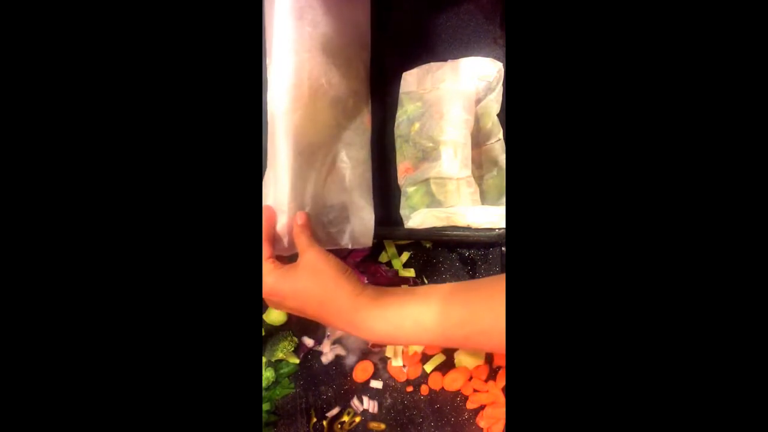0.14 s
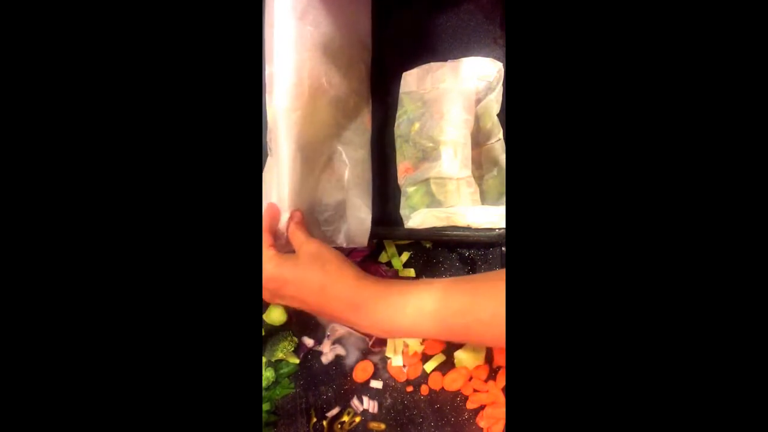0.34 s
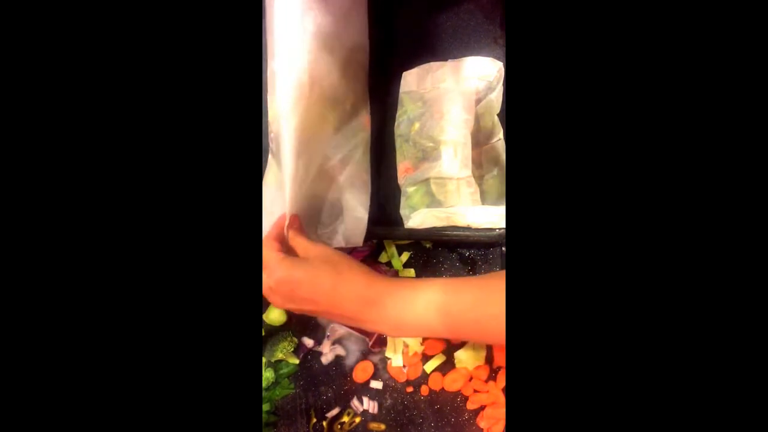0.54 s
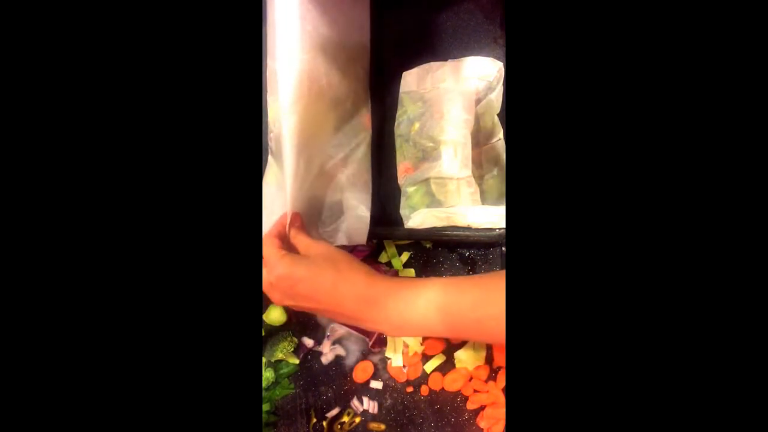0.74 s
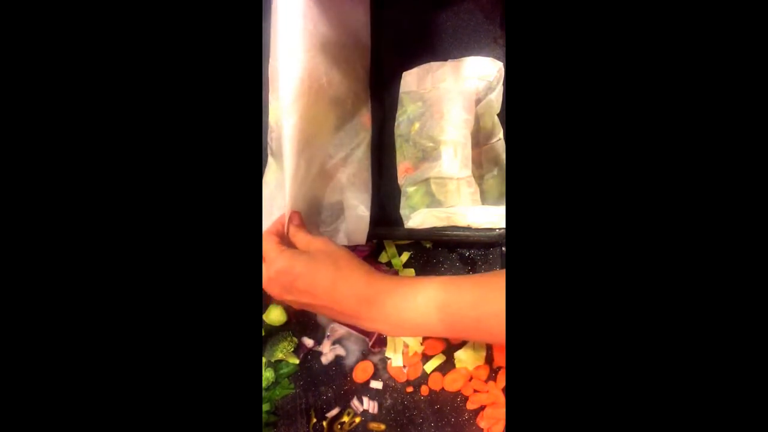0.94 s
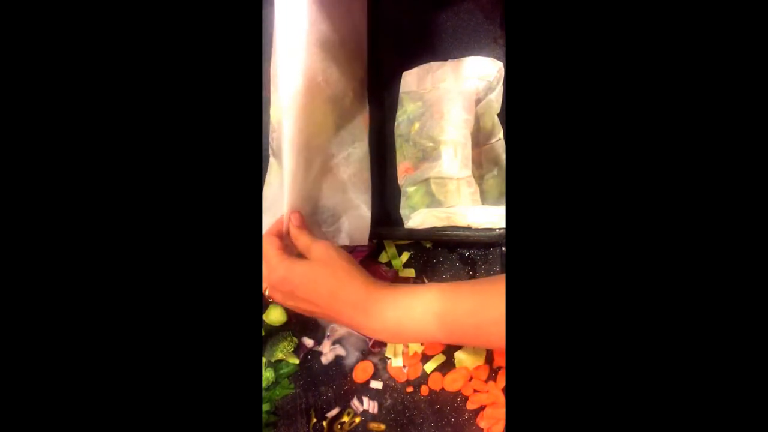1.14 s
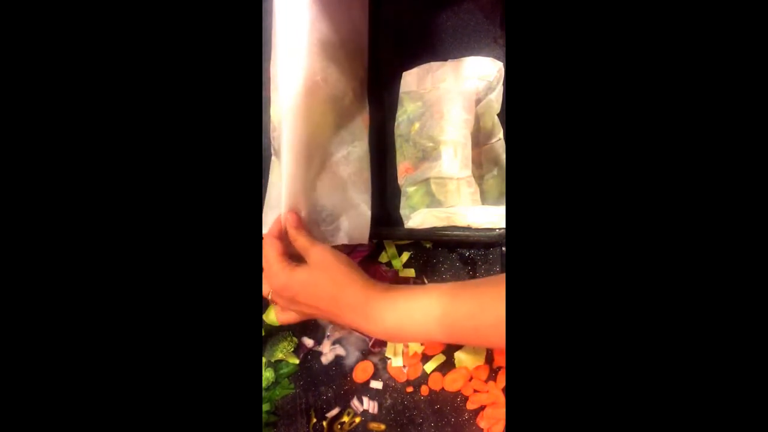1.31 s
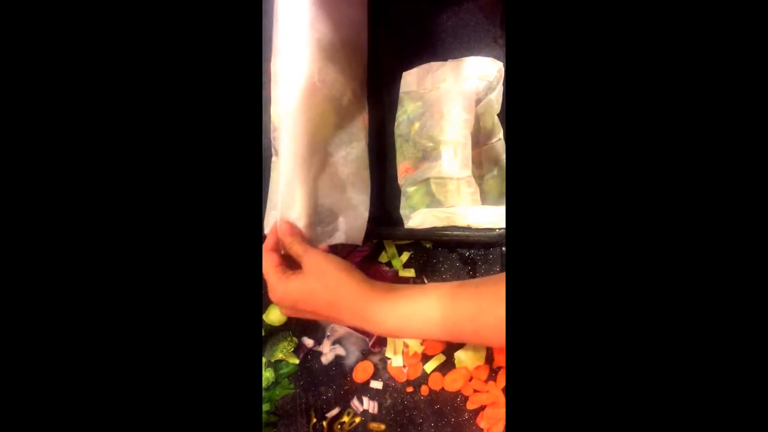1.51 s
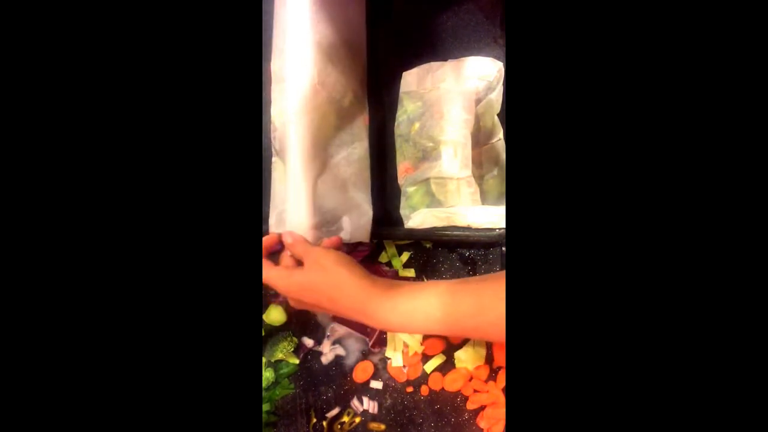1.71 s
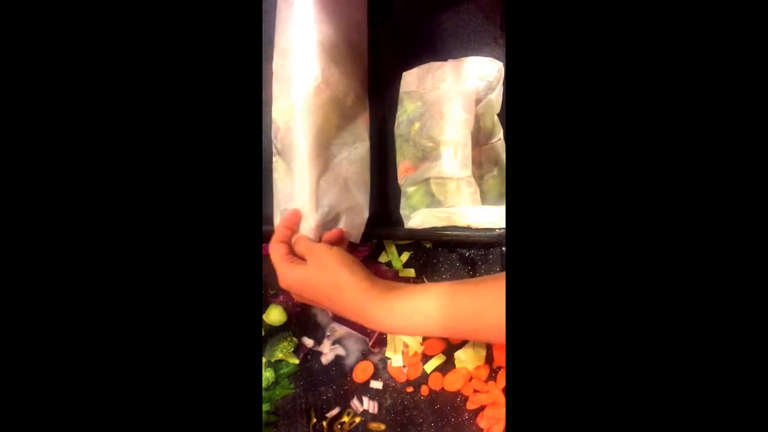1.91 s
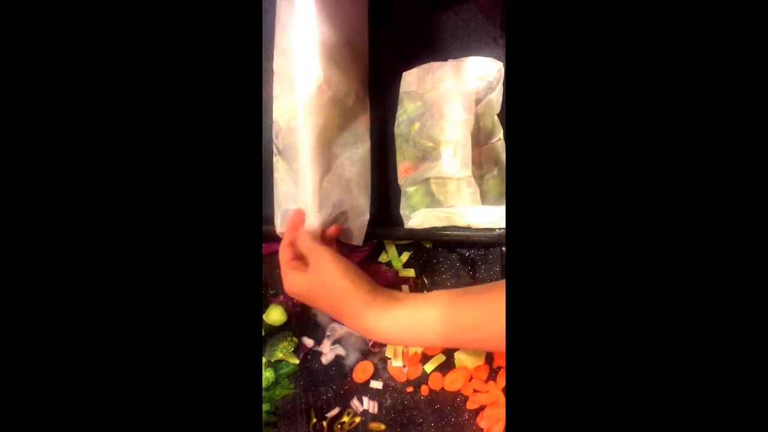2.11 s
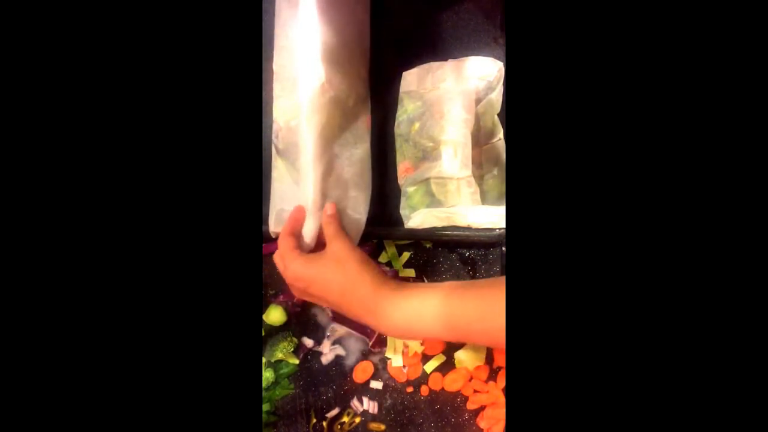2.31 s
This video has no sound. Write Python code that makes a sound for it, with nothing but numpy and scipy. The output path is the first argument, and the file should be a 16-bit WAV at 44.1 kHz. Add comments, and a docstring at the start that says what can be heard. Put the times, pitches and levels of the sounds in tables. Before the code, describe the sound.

Parchment paper crinkles and crackles in short bursts as fingers pinch and fold a packet

```python
"""Short runs of tiny, bright clicks crackle over a papery rustle, close to the microphone, with a faint mains hum.
A hand folds and pinches the edge of a parchment paper packet in a kitchen: creases buckle in runs of clicks,
each ringing a stiff facet of the sheet. Denser, clumped clicks make the rustle; swells of filtered clicks make
the flexing panels and the packet's soft bumps. A decaying noise tail gives the room; sines and noise lie under it."""
import sys
import numpy as np
from scipy import signal
from scipy.fft import rfft, irfft
from scipy.io import wavfile
from scipy.ndimage import uniform_filter1d

SR = 44100
rng = np.random.default_rng(int(sys.argv[2]) if len(sys.argv) > 2 else 0)


def store_wav(level_fs):
    """Save 16-bit WAV to argv[1]."""
    pcm = np.round(np.clip(np.atleast_2d(level_fs), -1, 1) * 32767)
    wavfile.write(sys.argv[1], SR, pcm.T.astype(np.int16))


N = 103635  # length in samples

# Mains hum. Each row: pitch in Hz, level in dB.
HUM_TONES = [(59.3, -53.5), (119.6, -54.5)]
# Colour of the still kitchen air. Each row: frequency in Hz, relative spectrum level in dB.
AIR_COLOUR = [(20, -10), (55, -2), (150, -1), (250, -11.5), (15000, -37)]
# The hand nudges the packet against the pan. Each row: start in seconds, level in dB.
PACKET_BUMPS = [(0.675, -45), (1.825, -55)]
# A broad panel of the sheet pops over. Each row: start in seconds, centre pitch in Hz, level in dB.
PANEL_FLEXES = [(0.216, 771, -38.5), (0.621, 1020, -28), (1.655, 838.1, -35), (1.709, 2651, -47),
                (1.745, 2412, -34), (1.877, 2581, -34.5), (1.96, 2314, -33.5), (2.246, 903.2, -37.5)]
# Bass, middle and treble ranges of the sheet. Each row: lower edge in Hz, upper edge in Hz.
SHEET_BANDS = [(450, 1620.2), (1600, 5606.7), (5500, 13307)]
# Colour of the paper's facets. Each row: frequency in Hz, relative level in dB.
PAPER_COLOUR = [(300, -15), (750, -5), (1100, 2.5), (1800, -7), (2550, 4), (4900, -1.5), (8500, 2.5),
                (10300, -5.5), (15000, 3.5)]
# Rustle as the fingers work the sheet. Each row: time in seconds, then bass, middle and treble levels in dB.
RUSTLE_LEVELS = [(0, -48.5, -39.5, -47.5), (0.09, -58, -58, -58.5), (0.134, -44.5, -45, -54.5),
                 (0.16, -53.5, -59, -63), (0.216, -45, -43, -50.5), (0.285, -60.5, -56, -62),
                 (0.355, -48, -44.5, -52), (0.41, -50, -44.5, -45.5), (0.5, -52.5, -47, -49),
                 (0.588, -46, -40, -46.5), (0.603, -35.5, -29, -21.5), (0.635, -40.5, -31, -29.5),
                 (0.68, -42.5, -32.5, -32.5), (0.75, -60, -57.5, -61), (0.855, -54, -50.5, -55.5),
                 (0.879, -50.5, -38, -37), (0.898, -44, -36.5, -39.5), (0.925, -60.5, -58, -71),
                 (1.035, -60, -50, -55.5), (1.07, -43.5, -39.5, -39), (1.129, -51, -40.5, -46),
                 (1.206, -41, -41.5, -44.5), (1.245, -54.5, -46, -48.5), (1.34, -58.5, -45.5, -47.5),
                 (1.455, -45.5, -41, -39.5), (1.52, -53, -41.5, -42.5), (1.55, -54.5, -54.5, -58.5),
                 (1.585, -45.5, -40, -43.5), (1.665, -44, -38, -39), (1.8, -48.5, -48, -49.5),
                 (1.881, -44.5, -35.5, -39.5), (1.895, -58, -56.5, -59), (1.97, -42.5, -37, -42),
                 (2.02, -49, -45.5, -45.5), (2.06, -40, -35.5, -37.5), (2.09, -53, -46.5, -44),
                 (2.18, -52, -46, -44), (2.281, -46, -46.5, -48), (2.31, -53, -52.5, -55.5)]
# Buckling creases. Each row: start in seconds, length in seconds, then bass, middle and treble levels in dB.
CREASE_SNAPS = [(0.0217, 0.002177, -42, -37, -34), (0.041, 0.001972, -47, -35, -42),
                (0.0455, 0.002001, -43.5, -32.5, -35), (0.1256, 0.005183, -52, -38, -44),
                (0.1667, 0.003599, -39.5, -39.5, -36), (0.1752, 0.003318, -41, -33.5, -37.5),
                (0.202, 0.003622, -44.5, -34.5, -32), (0.2204, 0.001977, -43.5, -29.5, -38),
                (0.2278, 0.003376, -45.5, -27.5, -33.5), (0.27, 0.00308, -51, -38, -48),
                (0.3337, 0.00338, -50.5, -33.5, -41), (0.3473, 0.00257, -56, -33.5, -33),
                (0.355, 0.004695, -57, -30, -36), (0.3728, 0.002584, -56.5, -28.5, -29.5),
                (0.4022, 0.004857, -37, -30, -31), (0.5918, 0.01052, -38.5, -32, -34.5),
                (0.6115, 0.003393, -27.5, -26, -17), (0.6245, 0.004805, -29.5, -36.5, -27),
                (0.6458, 0.006162, -39.5, -24.5, -20.5), (0.6884, 0.004548, -39.5, -29, -42),
                (0.7006, 0.001648, -50.5, -34, -26), (0.712, 0.004583, -42, -36, -33),
                (0.77, 0.009485, -44, -45.5, -42.5), (0.8301, 0.003133, -74, -38, -45),
                (0.9316, 0.002783, -51.5, -40, -30.5), (0.968, 0.006533, -42, -39.5, -52),
                (0.987, 0.004712, -49.5, -40, -35), (1.0046, 0.001026, -60.5, -32.5, -35.5),
                (1.041, 0.00722, -55, -38.5, -44), (1.144, 0.006456, -44, -34.5, -34.5),
                (1.1748, 0.0018776, -55.5, -34, -20), (1.2098, 0.005019, -39, -32.5, -29.5),
                (1.256, 0.002444, -52, -49, -32), (1.2729, 0.005284, -43.5, -34, -32),
                (1.34, 0.002322, -62, -35, -40), (1.361, 0.001574, -56, -32, -44.5),
                (1.38, 0.004242, -40.5, -34, -37.5), (1.4216, 0.001138, -53.5, -40, -27.5),
                (1.5049, 0.003987, -39, -42.5, -32.5), (1.5124, 0.00701, -46.5, -35, -29),
                (1.524, 0.001211, -40, -35, -23.5), (1.5723, 0.004642, -43.5, -35, -35),
                (1.6133, 0.001866, -53, -29, -38), (1.6647, 0.00228, -41.5, -32, -41.5),
                (1.6793, 0.00201, -41.5, -34.5, -34), (1.8089, 0.001955, -48.5, -33.5, -40),
                (1.832, 0.001663, -36, -33.5, -34), (1.8367, 0.003427, -47, -25, -21),
                (1.9043, 0.003697, -41.5, -35.5, -39), (1.923, 0.00583, -46, -35, -35),
                (1.9489, 0.001447, -36.5, -33.5, -26.5), (2.007, 0.003032, -41, -35.5, -26.5),
                (2.026, 0.00053, -39, -53.5, -22), (2.0388, 0.002082, -38, -27, -23),
                (2.0433, 0.002474, -32, -24, -26), (2.048, 0.003374, -31, -41.5, -21),
                (2.1057, 0.0006405, -51.5, -29.5, -26), (2.246, 0.00368, -40.5, -35.5, -34.5),
                (2.2715, 0.00113, -58, -35, -28.5), (2.276, 0.0011574, -42.5, -33.5, -29),
                (2.3429, 0.001661, -40.5, -29, -24.5)]

HUM_WAVER = .1  # radians of phase, and share of level
AIR_DB = -57
ROOM_DB, ROOM_T60_S = -13.5, 0.31584  # tail against the direct sound
ROOM_TREBLE_DB, ROOM_TREBLE_T60_S = 1, 0.17405  # treble against the rest of the tail
THUMP_HZ, THUMP_RISE_S = (79.9, 234.5), 0.013234
FLEX_WIDTH_HZ, FLEX_RISE_S = 405.5, 0.0043065
BODY_HZ, BODY_DB = (146.88, 339.79), -19  # the whole packet answers under the bass of the sheet
# Ring time of a facet at 3 kHz, how fast it shortens with pitch, and the unevenness of its modes.
RING_S, RING_SLOPE, FACET_SPREAD_DB = 0.00083036, 0.5089, 3
TRAVEL_S = 0.00092313  # time for a 3 kHz bending wave to cross a facet; lower pitches travel more slowly
RUSTLE_CLICKS_PER_S, RUSTLE_SPREAD_DB = 3200, 3
CLUMP_DB, CLUMP_S = 1.24, 0.006047  # depth and rough span of the rustle's clumps
SHAPE_S = .03  # the bending sheet takes a new shape, with new facets, this often
SNAP_CLICKS_PER_S, SNAP_SPREAD_DB, FIRST_CLICK_DB = 4000, 1, 9.5
SNAP_BUILD, SNAP_DECAY = 0.4039, 1  # time constants of a run, as shares of its length
# The recorder turns down the lows while the sound is loud; the slope is dB of cut per dB of excess.
DUCK_BELOW_HZ, DUCK_ABOVE_DB, DUCK_S, DUCK_SLOPE = 181.2, -27.5, 0.12, 2.139
CUTOFF_HZ = 15600  # top of the treble


def amp(db):
    """Turns decibels into gain."""
    return 10 ** (np.asarray(db) / 20)


def unit(x):
    """Scales a sound to an rms of one."""
    return x / np.sqrt(np.mean(x ** 2) + 1e-20)


def read(points, hz):
    """Reads a spectrum in dB, interpolating along log frequency."""
    point_hz, point_db = np.transpose(points)
    return np.interp(np.log(hz + 1), np.log(point_hz), point_db)


def add(mix, s, sound):
    """Mixes a sound in from s seconds, cut off at the end of the mix."""
    part = mix[max(0, round(s * SR)):][:len(sound)]
    part += sound[:len(part)]


def band(x, lo_hz, hi_hz):
    """Passes one band with a causal filter."""
    edges = [lo_hz, min(hi_hz, SR / 2 - 500)]
    return signal.sosfilt(signal.butter(N=3, Wn=edges, btype="band", fs=SR, output="sos"), x)


def drift(span_s):
    """Smooth random wander that changes over about span_s."""
    hz = np.fft.rfftfreq(N, 1 / SR)
    spectrum = rfft(rng.standard_normal(N)) * np.exp(-(2 * hz * span_s) ** 2)
    return unit(irfft(spectrum, N))


def clicks(size, per_s, spread_db):
    """Random clicks of either sign, most small and a few large."""
    strength = amp(spread_db * np.minimum(rng.exponential(1, size), 4.5))
    happens = rng.random(size) < per_s / SR
    return happens * rng.choice([-1, 1], size) * strength


def still_air():
    """Low room noise: random noise shaped by the colour of the air."""
    gain = amp(read(AIR_COLOUR, np.fft.rfftfreq(N, 1 / SR)))
    air = irfft(rfft(rng.standard_normal(N)) * gain, N)
    return amp(AIR_DB) * unit(air)


def mains_hum():
    """Steady sines whose phase and level waver slightly."""
    t = np.arange(N) / SR
    hum = np.zeros(N)
    for hz, db in HUM_TONES:
        phase = 2 * np.pi * (hz * t + rng.random()) + HUM_WAVER * drift(0.1015)
        level = 1 + HUM_WAVER * drift(0.0463)
        hum += amp(db) * unit(np.sin(phase) * level)
    return hum


def kitchen(x, size=16000):
    """Reflections: the direct sound plus a short noise tail whose treble dies first."""
    t = np.arange(size) / SR
    noise = rng.standard_normal(size) * np.minimum(t / 0.010445, 1)  # the tail fades in
    tail = band(noise, 131.7, 5521) * amp(-60 * t / ROOM_T60_S)
    tail += band(noise, 3753, 23663) * amp(ROOM_TREBLE_DB - 60 * t / ROOM_TREBLE_T60_S)
    response = amp(ROOM_DB) * tail / np.linalg.norm(tail)
    response[0] += 1  # direct sound
    return signal.fftconvolve(x, response / np.linalg.norm(response))[:N]


def swell(lo_hz, hi_hz, rise_s, size=4000):
    """Tiny clicks swell and fade in one broad resonance, peaking after rise_s."""
    age = np.arange(size) / SR / rise_s
    shape = (age * np.exp(1 - age)) ** 2
    ring = band(clicks(size, RUSTLE_CLICKS_PER_S, 0), lo_hz, hi_hz)
    return unit(ring * shape) * np.sqrt(np.mean(shape ** 2))


def thumps():
    """Soft, dull bumps of the packet: low-pitched swells of clicks."""
    out = np.zeros(N)
    for s, db in PACKET_BUMPS:
        add(out, s, amp(db) * swell(*THUMP_HZ, THUMP_RISE_S))
    return out


def flexes():
    """Panels of the sheet pop over, each a quick swell around its own pitch."""
    out = np.zeros(N)
    for s, hz, db in PANEL_FLEXES:
        sound = swell(hz - FLEX_WIDTH_HZ / 2, hz + FLEX_WIDTH_HZ / 2, FLEX_RISE_S)
        add(out, s, amp(db) * sound)
    return out


def facet(count=56, size=450):
    """Ring of one stiff patch of paper: heavily damped modes at random pitches, the high ones tending to lead."""
    # Pitches crowd towards the bass.
    hz = 200 + 16000 * ((np.arange(count) + rng.random(count)) / count) ** 2
    delay = TRAVEL_S * np.sqrt(3000 / hz) * 2 * rng.random(count)
    t = np.maximum(np.arange(size) / SR - delay[:, None], 0)
    ring_s = RING_S * (hz / 3000) ** -RING_SLOPE
    uneven_db = FACET_SPREAD_DB * rng.standard_normal(count)
    # Make up for the spacing of the modes and for their ring time.
    gain = amp(read(PAPER_COLOUR, hz) + uneven_db) * np.sqrt(np.sqrt(hz) / ring_s)
    modes = np.exp(-t / ring_s[:, None]) * np.sin(2 * np.pi * hz[:, None] * t)
    return unit((gain * rng.choice([-1, 1], count)) @ modes)


def ring_facets(train, count):
    """Each click excites one of several facets, picked at random."""
    which = rng.integers(0, count, len(train))
    return sum(np.convolve(train * (which == k), facet()) for k in range(count))


def colour(sound, levels_db):
    """Sets the bass, middle and treble of the paper; the body of the packet follows the bass."""
    bass, middle, treble = [amp(db) * unit(band(sound, lo, hi))
                            for db, (lo, hi) in zip(levels_db, SHEET_BANDS)]
    body = amp(levels_db[0] + BODY_DB) * unit(band(sound, *BODY_HZ))
    return bass - middle + treble + body


def rustle():
    """Dense clumps of tiny clicks, whose colour shifts as the paper slides and bends."""
    clumps = amp(CLUMP_DB * drift(CLUMP_S))
    train = clicks(N, RUSTLE_CLICKS_PER_S, RUSTLE_SPREAD_DB) * clumps
    sound = np.zeros(N)
    step = round(SHAPE_S * SR)
    for start in range(0, N, step):  # each shape has its own facets
        add(sound, start / SR, ring_facets(train[start:start + step], count=3))
    times, *curves = np.transpose(RUSTLE_LEVELS)
    levels_db = [np.interp(np.arange(N) / SR, times, db) for db in curves]
    return colour(sound, levels_db)


def snap(length_s, levels_db, size=1800):
    """A crease gives way: a run of clicks that builds quickly and dies away."""
    t = np.arange(size) / SR
    train = clicks(size, SNAP_CLICKS_PER_S, SNAP_SPREAD_DB) * np.exp(-t / (SNAP_DECAY * length_s))
    train[0] = amp(FIRST_CLICK_DB)
    build = 1 - np.exp(-t / (SNAP_BUILD * length_s))
    sound = ring_facets(train, count=3)[:size] * build
    # The levels hold over the length of the run, so a longer one carries more energy.
    return colour(sound, levels_db) * np.sqrt(length_s * SR / size)


def creases():
    """All the snaps of the sheet as its creases buckle."""
    out = np.zeros(N)
    for s, length_s, *levels_db in CREASE_SNAPS:
        add(out, s, snap(length_s, levels_db))
    return out


def scene():
    """The paper packet in the kitchen, over hum and still air."""
    paper = thumps() + flexes() + rustle() + creases()
    return (kitchen(paper) + mains_hum() + still_air())[None]


def record(dry):
    """Gain control on the lows, then a steep low-pass at the top of the treble."""
    power = abs(uniform_filter1d(dry ** 2, round(DUCK_S * SR)))
    level_db = 10 * np.log10(power + 1e-12)
    lows = signal.sosfiltfilt(signal.butter(N=4, Wn=DUCK_BELOW_HZ, fs=SR, output="sos"), dry)
    lows_gain = amp(-DUCK_SLOPE * np.maximum(level_db - DUCK_ABOVE_DB, 0))
    ducked = dry - lows * (1 - lows_gain)
    low_pass = signal.firwin(301, CUTOFF_HZ, window=("kaiser", 8), fs=SR)
    return signal.oaconvolve(ducked, low_pass[None], "same")


dry = scene()
out = record(dry)
store_wav(out)
```